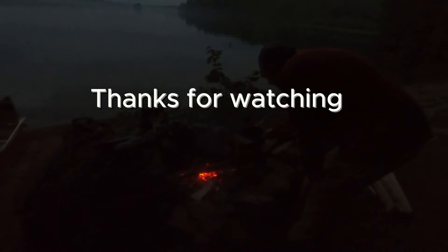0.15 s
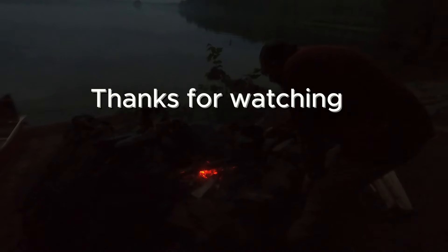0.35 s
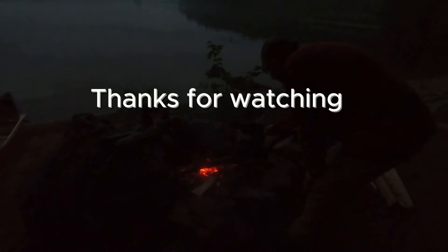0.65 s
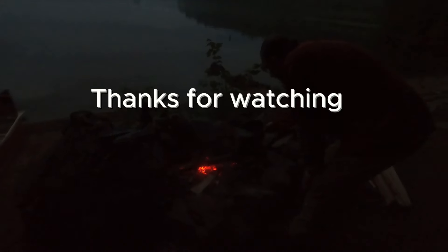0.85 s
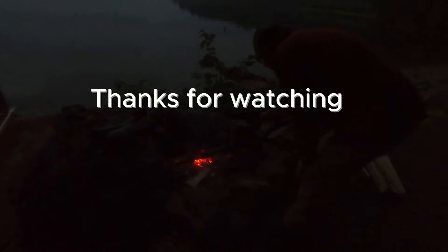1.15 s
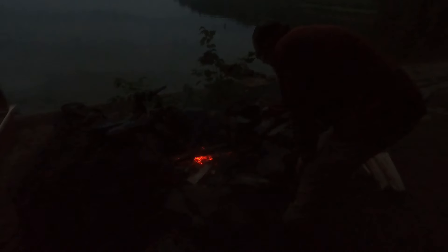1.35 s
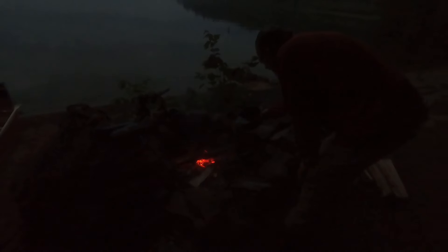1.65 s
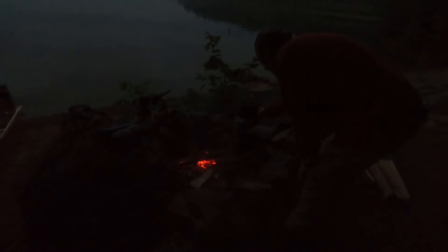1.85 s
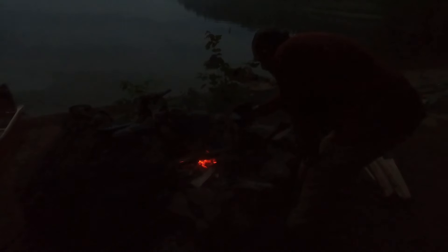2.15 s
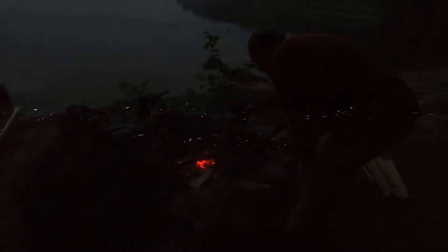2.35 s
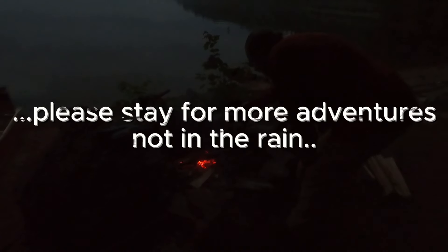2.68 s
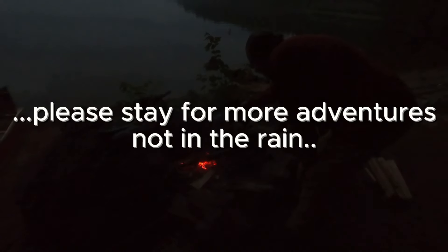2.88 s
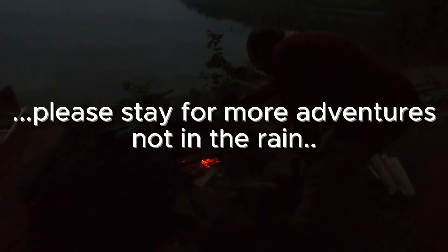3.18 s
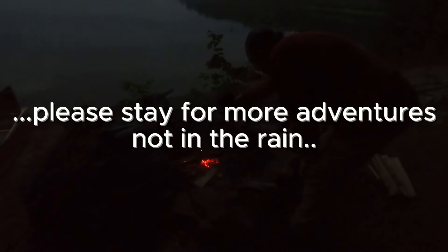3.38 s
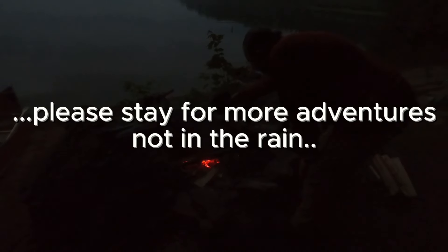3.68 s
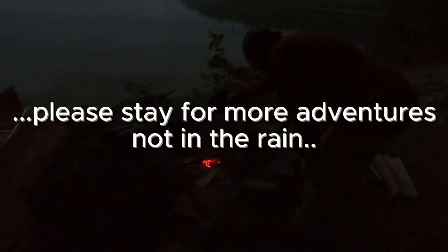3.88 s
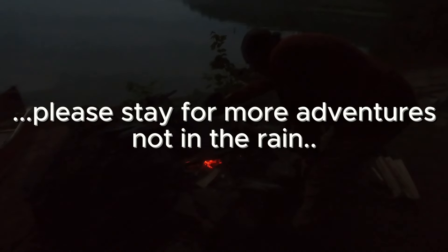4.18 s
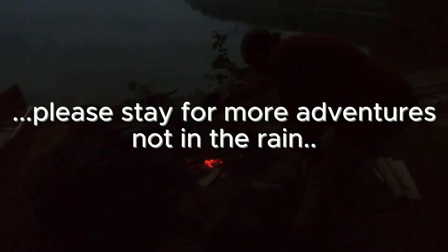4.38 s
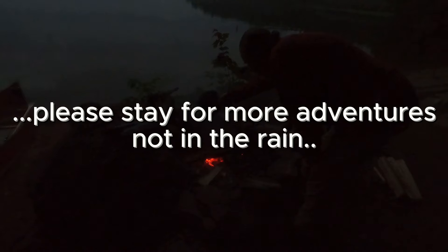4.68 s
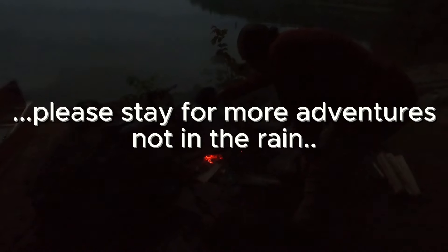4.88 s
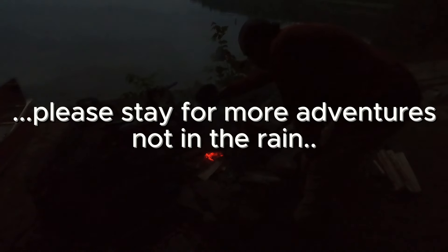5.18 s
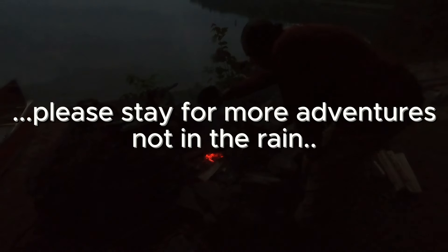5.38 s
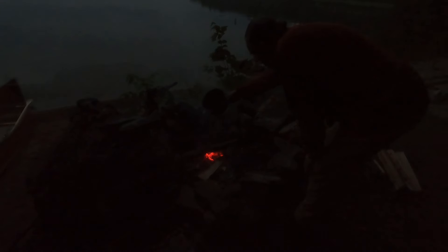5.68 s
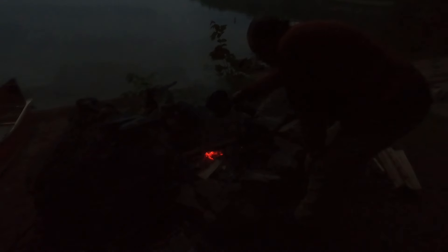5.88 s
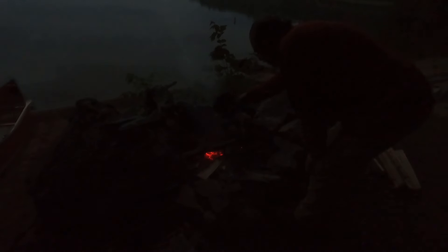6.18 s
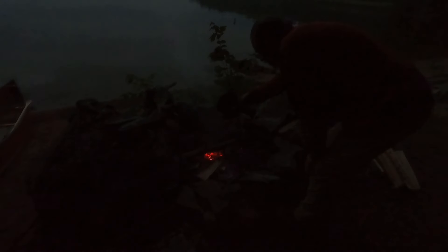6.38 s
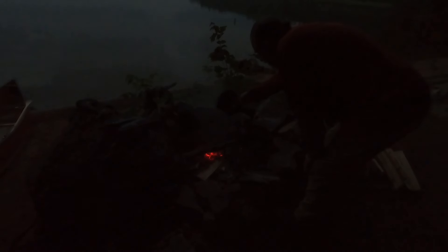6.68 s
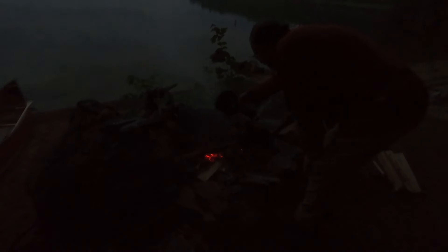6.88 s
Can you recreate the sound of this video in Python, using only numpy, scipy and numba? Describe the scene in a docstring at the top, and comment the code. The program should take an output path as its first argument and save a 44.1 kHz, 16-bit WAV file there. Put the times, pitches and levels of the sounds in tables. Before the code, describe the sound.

Water poured over hot coals on soft ground by a lake, heard up close in stereo with very little reverberation. Faint ticking gives way to a sudden spitting sizzle, which boils on to the end in uneven flickers. Slops of water thump and gurgle softly beneath it, strongest around two seconds and again late. Sharp crackles cluster at five seconds, then a few hollow bubbles pop as the hiss eases slightly.

```python
"""Steam bursts from campfire embers splashed with water: pockets thump and gurgle, droplets sizzle and spit.
Each layer is a shower of short rings whose loudness follows the slops of water and the steam off the coals.
Large pockets and bubbles ring singly; charcoal cracks are dry snaps with a treble fizz and crumbs behind.
Soft ground adds one close echo, and faint air lies behind it all, heard at two microphones."""
import sys
import numpy as np
from numba import njit
from scipy import signal
from scipy.fft import rfft, irfft
from scipy.io import wavfile
from scipy.ndimage import uniform_filter1d

SR = 44100
rng = np.random.default_rng(int(sys.argv[2]) if len(sys.argv) > 2 else 0)


def waveform_to_disk(signal):
    """Save audio, clipped to [-1, 1], as 16-bit WAV at the path in sys.argv[1]."""
    frames = np.transpose(np.atleast_2d(signal))
    scaled = np.clip(frames, -1, 1) * 32767
    samples = np.round(scaled).astype(np.int16)
    wavfile.write(sys.argv[1], SR, samples)


N = 310464
HZ = np.fft.rfftfreq(N, 1 / SR)
SECONDS = np.arange(N) / SR


def undb(db):
    """Turn decibels into a plain amplitude factor."""
    return 10 ** (np.asarray(db) / 20)


def unit(x):
    """Scale to an average (rms) level of 1."""
    return x / np.sqrt(np.mean(x ** 2))


def gain_at(points, hz):
    """Gain at the given frequencies, drawn between (Hz, dB) points."""
    knots, db = np.transpose(points)
    return undb(np.interp(np.log(hz + 1), np.log(knots), db))


def curves(rows):
    """Turn each column after the time into a line over the whole scene."""
    when, *columns = np.transpose(rows)
    return [np.interp(SECONDS, when, column) for column in columns]


def walk(rate):
    """A slowly wandering level: random steps of 1 / rate seconds, smoothed twice, with spread 1."""
    hold = int(SR / rate)
    steps = np.repeat(rng.standard_normal(N // hold + 1), hold)
    smooth = uniform_filter1d(uniform_filter1d(steps, hold), hold)
    return unit(smooth[:N])


@njit(fastmath=True)
def rings(start, turn, fade, left, right):
    """Each ring swells, then dies at its own pitch; turn (radians) and fade act once per sample."""
    out = np.zeros((2, N))
    for k in range(len(start)):
        c, s = np.exp(-fade[k]) * np.cos(turn[k]), np.exp(-fade[k]) * np.sin(turn[k])
        re, im = np.e * fade[k], 0.  # makes the envelope peak at 1
        for i in range(1, min(int(6.5 / fade[k]), N - start[k])):
            re, im = re * c - im * s, re * s + im * c
            out[0, start[k] + i] += i * (re * left[1, k] + im * left[0, k])
            out[1, start[k] + i] += i * (re * right[1, k] + im * right[0, k])
    return out


def real_and_imaginary(z):
    """Split complex start values into two rows."""
    return np.array([np.real(z), np.imag(z)])


def ring(s, hz, cycles, left, right):
    """Rings at times s that last a few cycles; left and right are complex: size and starting phase."""
    start = (s * SR).astype(np.int64)
    turn = 2 * np.pi * hz / SR
    fade = np.e * hz / SR / cycles
    return rings(start, turn, fade, real_and_imaginary(left), real_and_imaginary(right))


SPURTS_PER_S, SPURT_S = 28, 0.024  # average count per second, fade time in seconds


def spurts():
    """A level that jumps as each droplet flashes to steam, then fades quickly; mean 0, spread 1."""
    kicks = (rng.random(N) < SPURTS_PER_S / SR) * rng.exponential(size=N)
    level = signal.lfilter([1], [1, -np.exp(-1 / (SPURT_S * SR))], kicks)
    return unit(level - level.mean())


SLOP_RISE_S, SLOP_FALL_DB_S = 0.0214, 186  # swell in seconds, then decay in dB per second


def swells(rows):
    """Loudness over time of each dB column: every row swells, holds and dies away, and powers add."""
    power = np.zeros((len(rows[0][2:]), N))
    for s, hold_s, *db in rows:
        at = slice(int(s * SR), int((s + hold_s + 60 / SLOP_FALL_DB_S) * SR))
        since = SECONDS[at] - s
        swell = np.sin(np.pi / 2 * np.clip(since / SLOP_RISE_S, 0, 1)) ** 2
        shape = swell * undb(-SLOP_FALL_DB_S * np.maximum(since - SLOP_RISE_S - hold_s, 0))
        power[:, at] += (undb(db)[:, None] * shape) ** 2
    return np.sqrt(power)


# Tables named .._BURST hold one row: bursts per second, length in cycles, scatter of size in dB,
# flicker in dB, spread of phase between the two microphones in radians.
# Tables named .._COLOUR shape the pitch mix. Each row: frequency in Hz, relative level in dB per Hz.
BED_S = 1.8e-5  # spread of arrival lag between the microphones over the width of the bed, in seconds


def bursts(colour, burst, surge, pitch_factor=((0, 1), (1, 1))):
    """A shower of steam bursts of very unequal size, each from its own spot, pitched all over one colour."""
    rate, cycles, scatter_db, flicker_db, spread = burst
    count = int(rate * N / SR)
    chance, pitch, luck, phase = rng.random((count, 4)).T
    place = rng.standard_normal(count)
    when = chance * N / SR
    lowest, highest = colour[0][0], colour[-1][0]
    hz = lowest * (highest / lowest) ** pitch
    # high bursts are shorter and spread over more hertz, so they start larger
    size = hz * gain_at(colour, hz)
    size = size * undb(-scatter_db * np.log(np.maximum(luck, .002)))  # a few are far larger
    size = size * np.exp(2j * np.pi * phase)
    hz = hz * np.interp(when, *np.transpose(pitch_factor))
    # half of the phase difference goes to each side
    turn = np.exp(.5j * place * np.hypot(spread, 2 * np.pi * hz * BED_S))
    shower = ring(when, hz, cycles, size * turn, size / turn)
    # each layer flickers alone and also spurts with the others
    return unit(shower * undb(flicker_db * (0.89 * walk(25) + 0.33 * surge)))


# Slops of water reaching the hot bed. Each row: start in seconds, hold in seconds,
# then the levels of thump, gurgle and deep layer in dB.
SLOPS = [(0.82, 0.075, -59, -64, -68), (0.94, 0.038, -64, -67.5, -84), (1.261, 0.014, -60, -76, -69),
         (1.36, 0.022, -60.5, -86, -78), (1.425, 0.027, -64, -85, -80), (1.66, 0.04, -62, -87, -87),
         (1.853, .02, -62, -82, -84), (1.9, 0.099, -51, -60, -64), (2.041, 0.073, -50.5, -58.5, -65),
         (2.14, 0.12, -52.5, -60, -71), (2.29, 0.15, -58, -64.5, -69), (2.42, 0.09, -56.5, -63, -86),
         (2.73, 0.13, -57.5, -71, -90), (2.902, 0.1, -76, -83, -89), (3.128, 0.016, -50, -56.5, -66),
         (3.411, 0.041, -59, -75, -78), (3.712, 0.027, -58.5, -72, -82), (4.054, 0.088, -61.5, -70, -92),
         (4.162, 0.019, -69, -81, -88), (4.333, 0.071, -61.5, -74, -90), (4.571, 0.1, -57, -62.5, -76),
         (4.691, 0.046, -52.5, -60, -71), (4.79, 0.059, -60.5, -68.5, -86), (5.43, 0.045, -64, -68, -75),
         (5.55, .02, -72, -70, -69), (5.7, 0.063, -68, -79, -79), (5.975, 0.036, -62, -59.5, -80),
         (6.135, 0.014, -53, -55.5, -59), (6.355, 0.075, -53.5, -59, -74), (6.425, 0.16, -57, -56.5, -77),
         (6.515, 0.022, -51, -50.5, -59), (6.566, 0.05, -56.5, -65, -76), (6.78, 0.033, -54, -61.5, -66),
         (6.867, 0.086, -61.5, -71, -84)]
# Steam off the coals: dying away, first water, steady boil, a bigger pour, ebb.
# Each row: time in seconds, then the levels of gush, sizzle and spit in dB.
STEAM = [(0, -72, -60.5, -63.5), (.2, -76.5, -61.5, -65), (.3, -76, -67, -67), (.66, -76, -67.5, -69),
         (0.6635, -54, -48, -64), (.672, -64, -53.5, -57), (.72, -60, -51, -51), (.77, -63, -56.5, -55.5),
         (.84, -60, -52, -57), (.87, -54, -50, -53), (1.1, -61.5, -49, -55.5), (1.46, -59.5, -54, -55),
         (1.69, -57.5, -47.5, -52.5), (1.89, -62, -52, -56.5), (1.93, -52, -46.5, -48.5),
         (2.07, -57, -47.5, -50.5), (2.2, -57, -48.5, -53), (2.8, -56, -48, -54), (3.3, -58, -49.5, -54.5),
         (3.43, -56, -47.5, -51.5), (3.76, -56, -48, -54.5), (4.15, -57.5, -48.5, -55),
         (4.57, -58.5, -50.5, -57), (4.82, -56, -48.5, -53.5), (4.89, -56.5, -43, -50),
         (4.95, -56, -47.5, -53), (5.26, -56.5, -48, -53), (5.43, -60.5, -50.5, -56),
         (5.66, -57, -48.5, -52.5), (5.84, -57, -50.5, -53.5), (6.5, -54, -49, -56),
         (6.7, -58, -50.5, -53.5), (7.04, -57.5, -53, -55.5)]


def embers():
    """Layers of boiling follow the steam and swell with each slop, over the smoulder of damp coals."""
    slops = swells(SLOPS)
    steam = [undb(db) for db in curves(STEAM)]
    surge = spurts()
    boil = thumps_and_gurgles(slops, surge) + steam_off_coals(slops, steam, surge)
    boil = boil + seething(surge) + spattering()
    return boil + deep_thuds(slops, steam, surge) + smoulder(surge)


THUMP_COLOUR = [(110, -76), (135, -6), (160, 3.5), (210, 0.5), (300, -3), (400, -17)]
GURGLE_COLOUR = [(500, -3.5), (630, 3), (720, 1), (810, 0), (920, -10)]
THUMP_BURST = (900, 6.04, 1.16, 0.22, 0.45)
GURGLE_BURST = (500, 8.5, 1.5, 0.85, 0.37)
# Low simmer between slops. Each row: time in seconds, thump level in dB, gurgle level in dB.
SIMMER = [(0, -84, -89), (.64, -82, -86), (.7, -75, -76), (1.06, -68.5, -72), (1.25, -72, -72),
          (1.5, -65, -73), (2.5, -62.5, -68), (3.7, -61, -69.5), (5.2, -66, -68), (5.9, -66, -67),
          (6.1, -62, -61), (7.04, -68, -66)]
SIMMER_SWAY_DB = 2.4  # spread of its slow sway


def thumps_and_gurgles(slops, surge):
    """Steam pockets under the coals burst in low rings, with each slop and in a swaying simmer."""
    thump_db, gurgle_db = curves(SIMMER)
    thump = np.hypot(slops[0], undb(thump_db + SIMMER_SWAY_DB * walk(8.1)))
    gurgle = np.hypot(slops[1], undb(gurgle_db + SIMMER_SWAY_DB * walk(8.1)))
    low = bursts(THUMP_COLOUR, THUMP_BURST, surge) * thump
    return low + bursts(GURGLE_COLOUR, GURGLE_BURST, surge) * gurgle


GUSH_COLOUR = [(900, -7), (1100, -1), (1250, -4.5), (1400, -7), (1550, -8)]
SIZZLE_COLOUR = [(2000, -5), (2800, -5), (3600, -3), (4300, -8), (5300, -5), (6600, -14)]
SPIT_COLOUR = [(6000, -10), (8000, -4), (9500, -9), (11000, -12.5), (13000, -17.5), (14500, -27)]
GUSH_BURST = (1500, 8.6, 0.59, 0.57, 0.45)
SIZZLE_BURST = (8000, 3.07, 0.35, 0.63, 0.13)
SPIT_BURST = (18000, 1.88, 1.64, 0.92, 0.24)
# What a slop adds, in dB: gush against its gurgle, then sizzle and spit against its thump.
FLASH_DB = (-0.5, -4, -9)
# Smaller droplets sizzle higher. Each row: time in seconds, pitch factor of the sizzle.
FINENESS = [(0, 1.07), (.75, 1.15), (.95, 1), (1.5, 0.98), (3, .97), (4.7, 1), (4.87, 1.1), (5.3, 1.06),
            (5.6, 1.025), (7.04, 1)]
# Pitch of gush and seethe sinks as the bed floods. Each row: time in seconds, pitch factor.
FLOOD_PITCH = [(1.2, 1.07), (2.2, 1.01)]
# Boiling blobs that whistle for a moment inside the sizzle.
BLOB_COLOUR = [(2100, -3.5), (2800, 2.5), (3350, 0.5), (4400, -9), (5400, -7)]
BLOB_BURST = (250, 39, 3, 3, .2)
BLOB_DB = -8.5  # against the sizzle


def steam_off_coals(slops, steam, surge):
    """Droplets flash to steam on top: short rings from a middling gush to treble spit, and longer blobs."""
    flash_db = FLASH_DB
    gush = np.hypot(steam[0], slops[1] * undb(flash_db[0]))
    sizzle = np.hypot(steam[1], slops[0] * undb(flash_db[1]))
    spit = np.hypot(steam[2], slops[0] * undb(flash_db[2]))
    out = bursts(GUSH_COLOUR, GUSH_BURST, surge, FLOOD_PITCH) * gush
    out = out + bursts(SIZZLE_COLOUR, SIZZLE_BURST, surge, FINENESS) * sizzle
    out = out + bursts(BLOB_COLOUR, BLOB_BURST, surge) * sizzle * undb(BLOB_DB)
    return out + bursts(SPIT_COLOUR, SPIT_BURST, surge) * spit


SEETHE_COLOUR = [(1450, -8), (1630, 0.5), (1750, 1), (1900, -11.5), (2250, -13)]
SEETHE_BURST = (1500, 15.2, .8, 0.36, 0.14)
# Each row: time in seconds, level in dB.
SEETHE_LEVEL = [(0.0, -71.5), (0.63, -83), (0.68, -63.5), (0.82, -72), (0.86, -56.5), (1.15, -55),
                (1.22, -59), (1.9, -60), (1.92, -57), (3.37, -60), (3.71, -54.5), (5.94, -60), (6.0, -55),
                (6.06, -57), (6.63, -54.5), (6.67, -60), (7.0, -59), (7.04, -58)]


def seething(surge):
    """Seething water is a narrow band of longer rings whose pitch sinks."""
    level_db, = curves(SEETHE_LEVEL)
    return bursts(SEETHE_COLOUR, SEETHE_BURST, surge, FLOOD_PITCH) * undb(level_db)


SPATTER_COLOUR = [(2200, -3.5), (3200, 1), (4200, -9), (5200, -0.5), (6000, -10)]
SPATTER_BURST = (1300, 7.9, 3.4, 2.3, 0.14)
# Each row: start in seconds, hold in seconds, level in dB.
SPATTERS = [(.695, .04, -64), (1.09, 0.017, -59), (2.85, 0.032, -50), (3.69, 0.07, -53),
            (4.86, 0.08, -50.5), (4.98, 0.077, -51), (5.11, 0.13, -53), (5.34, 0.025, -51),
            (5.48, 0.024, -51)]


def spattering():
    """Brief spells of spattering droplets, with spurts of their own."""
    return bursts(SPATTER_COLOUR, SPATTER_BURST, spurts()) * swells(SPATTERS)


DEEP_COLOUR = [(35, -23), (55, -3), (90, -3), (125, 4.5)]
DEEP_BURST = (200, 1.7, 1.4, 1.2, 0.44)
DEEP_DB = -50  # level between slops, against the gush of the steam


def deep_thuds(slops, steam, surge):
    """The lowest bursts swell with each slop and stay very faint between."""
    return bursts(DEEP_COLOUR, DEEP_BURST, surge) * np.hypot(slops[2], steam[0] * undb(DEEP_DB))


# Each row: pitch in Hz, length in cycles, level in dB against the thump or gurgle of the slop.
POCKET = [(197, 4.9, 0.5), (738, 8.4, 1)]
POCKET_SCATTER = 0.18  # largest random shift up or down, as a share of the pitch


def pockets():
    """Each slop lets out one big pocket of steam that rings low and high at once."""
    s, hold_s, *levels = np.transpose(SLOPS)
    late, *chances = rng.random((len(s), 3)).T
    when = s + late * SLOP_RISE_S
    out = 0
    for (hz, cycles, db), level_db, chance in zip(POCKET, levels, chances):
        size = undb(level_db + db)
        pitch_hz = hz * (1 + POCKET_SCATTER * (2 * chance - 1))
        out = out + ring(when, pitch_hz, cycles, size, size)
    return out


# The largest bubbles. Each row: start in seconds, peak level in dB, pitch in Hz, length in cycles.
BUBBLES = [(0.729, -48, 1135, 5.8), (5.71, -57, 312, 18), (6.4575, -40.5, 715, 5.1),
           (6.459, -41, 1110, 9.5), (6.473, -46, 720, 6.8), (6.507, -44, 636, 8), (6.5405, -36, 670, 4.4),
           (6.542, -42, 235, 1.8), (6.555, -44.5, 110, 1.6), (6.562, -48, 720, 13), (6.6, -47.5, 663, 9),
           (6.8, -46, 231, 6)]


def bubbles():
    """Single large bubbles of the gurgle, each a short rounded tone."""
    s, db, hz, cycles = np.transpose(BUBBLES)
    return ring(s, hz, cycles, undb(db), undb(db))


# Cracks of charcoal. Each row: start in seconds, peak level in dB, pitch in Hz, length in cycles,
# level of each treble fizz grain in dB, left minus right in dB.
CRACKS = [(0.1035, -34.5, 4460, 2, -54, -1.0), (0.191, -46, 8500, 1.2, -47, -2.0),
          (0.2044, -40, 4200, 1.3, -56, -1.0), (0.2754, -35.5, 7500, 1.9, -59, -3.0),
          (0.418, -46, 5690, 5.3, -56, -1.0), (0.43, -44, 4000, 5, -64, -1.0),
          (0.4368, -36.5, 6000, 1.7, -56, -1), (0.4544, -46, 5700, 2.3, -62, -1.0),
          (0.464, -39, 5000, 1.6, -56, -1.0), (0.5743, -52, 5440, 4, -71, -1.0),
          (0.662, -41, 3260, 2.7, -51, -1.5), (0.691, -40, 2400, 2.7, -59, -1),
          (0.699, -39, 4120, 2.2, -59, -1.0), (0.7125, -34, 4330, 4, -52, -0.5),
          (0.7192, -34, 5200, 3, -45, -1.0), (0.721, -39, 4500, 4, -56, -1),
          (0.7285, -42, 2500, 1.2, -57, 0), (0.8064, -30, 5430, 2.4, -43, 0),
          (0.8506, -31.5, 7900, 3.6, -54, -1.5), (0.8503, -38, 2900, 1.3, -60, 2),
          (0.935, -34.5, 3740, 1.3, -56, -3), (1.0125, -43, 1860, 5.4, -58, 4),
          (1.1417, -43, 1810, 4.7, -60, -0.5), (1.2933, -42, 3680, 1.5, -47, 0.0),
          (1.4267, -37.5, 1970, 4.1, -65, -0.5), (1.5462, -33, 3000, 3.9, -52, -0.5),
          (1.5464, -37, 5000, 2.5, -60, 4), (1.598, -40, 3350, 5.5, -62, 0), (1.63, -37, 2900, 3, -60, 0),
          (1.635, -35.5, 5200, 3, -60, 0), (1.697, -38, 2800, 1.5, -56, 0),
          (1.6122, -37.5, 1800, 2.5, -58, 3), (1.679, -37, 3120, 2, -51, 1),
          (1.763, -35, 2920, 1.6, -43, -1), (1.8488, -36, 2180, 3.5, -47, -1.0),
          (1.921, -40, 3640, 1.5, -55, -1.0), (1.9392, -32, 1620, 0.72, -51, 2),
          (2.6561, -33, 2070, 4.3, -59, 1), (2.6565, -37, 5400, 5, -62, 1), (2.656, -40, 3220, 2, -62, 1),
          (3.0234, -39, 6300, 2.8, -58, -0.5), (3.1448, -31.5, 3500, 1.5, -42.5, 0),
          (3.4764, -38, 2670, 1.2, -58, -0.5), (3.65, -42, 1060, 3.8, -64, -3),
          (3.7544, -33, 2780, 1.4, -51, -2), (3.7978, -36, 3280, 2, -40, -1.0),
          (4.6653, -38, 2870, 1.3, -41.5, -1.5), (4.861, -29, 5500, 2.4, -56, 1),
          (4.865, -32, 2000, 1.5, -56, 0.0), (4.8834, -36, 3560, 1.8, -56, -0.5),
          (4.892, -33, 3540, 1.7, -52, -0.5), (4.9318, -29.5, 4300, 2, -52, 0.0),
          (4.876, -39, 3000, 1.6, -56, 0), (4.921, -29, 4800, 2, -61, 0), (4.9615, -41, 3200, 2, -58, 0),
          (4.97, -35, 3900, 1.7, -58, 0), (5.0105, -35, 3300, 1.7, -58, 0), (5.061, -34, 3300, 2.3, -58, 0),
          (5.083, -36, 5440, 1.8, -51, 0), (5.1443, -29.5, 4700, 2, -56, 0), (5.129, -31, 4500, 2, -58, 0),
          (5.193, -35, 4800, 2, -58, 0), (5.265, -38, 3520, 2.5, -58, 0), (5.373, -39, 2580, 2.8, -60, 2),
          (5.516, -37, 3500, 1.8, -56, 0), (5, -32, 5340, 1.3, -56, -1.0), (5.02, -27, 4800, 1.6, -57, -1),
          (5.0198, -39, 1600, 1.6, -60, 0), (5.036, -30, 3330, 2.8, -56, 0),
          (5.1213, -32, 5200, 2.3, -62, -2), (5.1412, -33, 3270, 2.2, -55, 2),
          (5.1602, -32, 3120, 3.2, -44, 1), (5.2146, -32, 1910, 2.1, -57, -1.5),
          (5.2147, -28.5, 4870, 2.8, -61, -1.0), (5.2401, -27.5, 4380, 2.6, -55, -0.5),
          (5.28, -46, 3260, 1.5, -50, -12), (5.3555, -32.5, 4200, 2.5, -48, -0.5),
          (5.4939, -29.5, 3580, 1, -59, 2), (5.6445, -35, 3360, 1.3, -41, -2),
          (5.9972, -36.5, 1670, 3.1, -61, 2), (6.107, -43, 1210, 2.4, -49, 0),
          (6.0247, -38, 1710, 1.5, -46, -0.5)]
TICK_HZ, TICK_CYCLES, FIZZ_S = 9300, 2.13, 0.0037  # fizz: middle pitch, grain length, spread in seconds
CRUMBLE_DB, CRUMBLE_S = -16, 0.005  # falling crumbs: level against the snap, spread in seconds


def cracks():
    """Each crack is a dry snap of a few cycles at its own pitch, trailed by grains of fizz and crumbs."""
    s, db, hz, cycles, fizz_db, pan_db = np.transpose(CRACKS)
    side = undb(pan_db / 2)
    out = ring(s, hz, np.maximum(cycles, .5), undb(db) * side, undb(db) / side)
    fizz = fizz_db, TICK_HZ, FIZZ_S
    crumbs = db + CRUMBLE_DB, hz, CRUMBLE_S
    for tail_db, tail_hz, tail_s in (fizz, crumbs):
        late, pitch, phase = rng.random((len(s), 24, 3)).T  # 24 grains each
        # most grains crowd right behind the snap, a few straggle
        when = s - tail_s * np.log(1 - late) * late
        size = undb(tail_db) * np.exp(2j * np.pi * phase)
        pitch_hz = tail_hz * (.7 + .6 * pitch)
        left, right = (size * side).ravel(), (size / side).ravel()
        out = out + ring(when.ravel(), pitch_hz.ravel(), TICK_CYCLES, left, right)
    return out


SMOULDER_COLOUR = [(180, -39), (300, -16), (434, 6.5), (787, -2.5), (1760, 3), (4400, -3), (5510, 4),
                   (14000, -18)]
SMOULDER_BURST = (13000, 6.4, 2.7, 0.19, 1.5)
SMOULDER_DB = -70


def smoulder(surge):
    """Damp coals smoulder: a faint wash of bursts at one steady average level."""
    inner_colour = SMOULDER_COLOUR[1:-1]  # the outermost two rows stay silent
    return undb(SMOULDER_DB) * bursts(inner_colour, SMOULDER_BURST, surge)


# Echo: lag in seconds, phase turn in radians, strength in dB, frequency in Hz where it dulls.
GROUND_S, GROUND_TURN, GROUND_DB, GROUND_HZ = 0.00197, 3.3, -23, 6000


def ground(fire):
    """Soft ground sends back one dull, phase-turned echo, so close that it combs the spectrum."""
    strength = undb(GROUND_DB) / (1 + (HZ / GROUND_HZ) ** 2)
    echo = strength * np.exp(1j * (GROUND_TURN - 2 * np.pi * HZ * GROUND_S))
    return irfft(rfft(fire) * (1 + echo), N)


# Colour of the air. Each row: frequency in Hz, relative level in dB per Hz.
AIR = [(30, -4), (60, -9), (150, 5), (500, -3.5), (2000, -50), (6000, -6.5), (14000, -21)]
AIR_DB = -72.5


def air():
    """Faint outdoor air: coloured noise, unrelated in the two microphones."""
    noise = rng.standard_normal((2, N))
    return undb(AIR_DB) * unit(irfft(rfft(noise) * gain_at(AIR, HZ), N))


def scene():
    """The fire with its ground echo, over the air."""
    return ground(embers() + pockets() + bubbles() + cracks()) + air()


# Treble roll-off of both microphones. Each row: frequency in Hz, gain in dB.
MIC = [(13000, -1), (14200, -3.5), (14900, -18), (15700, -29)]
# Each row: frequency in Hz, left minus right in dB.
LEFT_MINUS_RIGHT = [(60, 3), (110, -1.5), (200, 0), (380, -2.5), (700, -0.5), (1290, -1), (2380, 1),
                    (4400, -1), (8120, -2), (15000, -2.5)]
# Each row: frequency in Hz, phase lead of the left over the right in radians.
LEFT_LEADS = [(0, 0.58), (1400, -0.3), (3000, -0.78), (5200, -0.74), (7200, -1.78), (8600, 0.64),
              (10400, -1.77), (14000, -1.3)]
TOP_HZ = 15700  # steep cut above this


def record(dry):
    """The microphones' body shades and phase-shifts one side against the other; the top is cut steeply."""
    lead = np.interp(HZ, *np.transpose(LEFT_LEADS))
    # the square root gives each side half of the difference
    tilt = np.sqrt(gain_at(LEFT_MINUS_RIGHT, HZ) * np.exp(1j * lead))
    sides = gain_at(MIC, HZ) * np.array([tilt, 1 / tilt])
    heard = irfft(rfft(dry) * sides, N)
    return signal.sosfilt(signal.ellip(8, .2, 70, TOP_HZ, fs=SR, output="sos"), heard)


dry = scene()
out = record(dry)
waveform_to_disk(out)
```